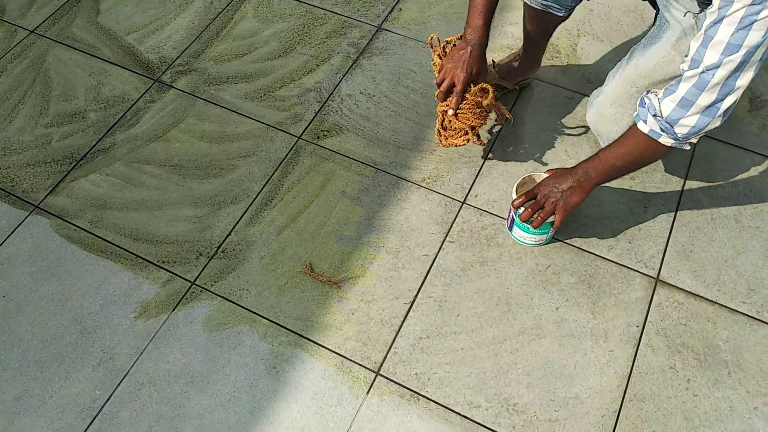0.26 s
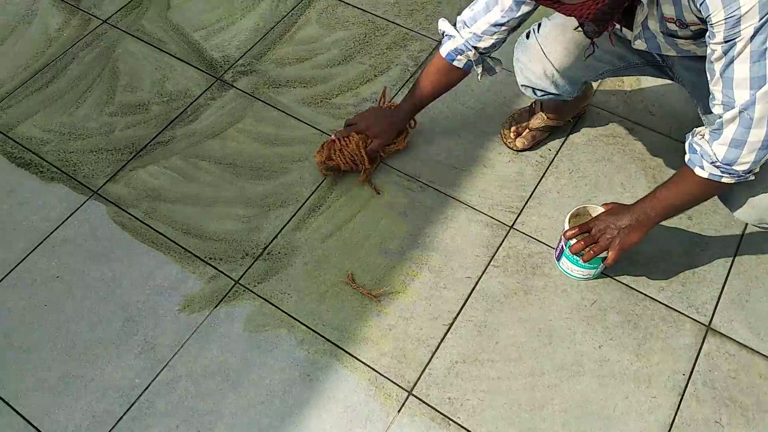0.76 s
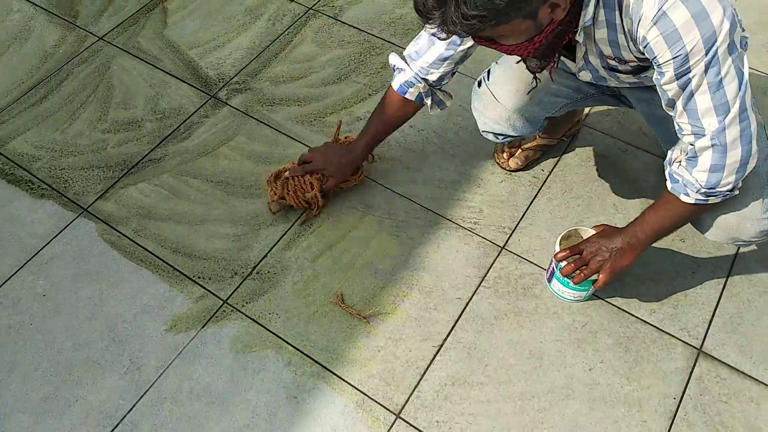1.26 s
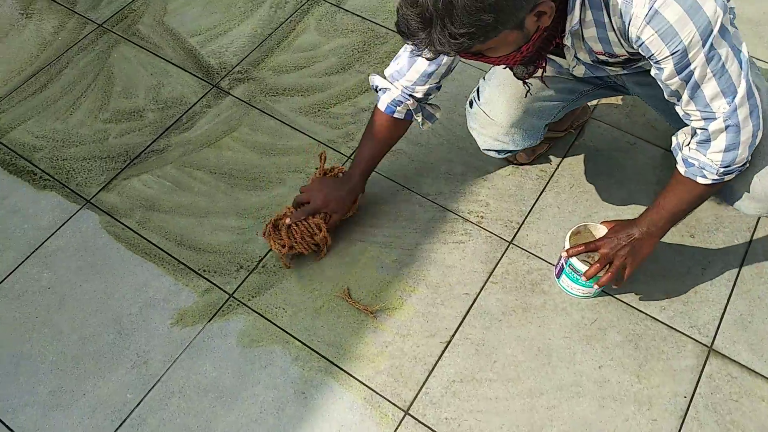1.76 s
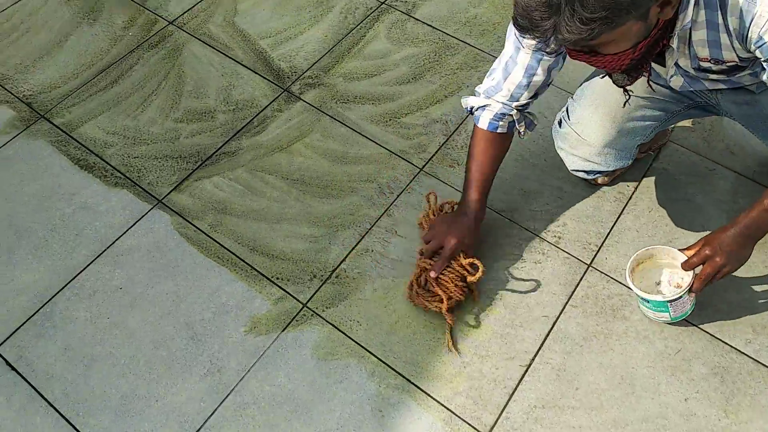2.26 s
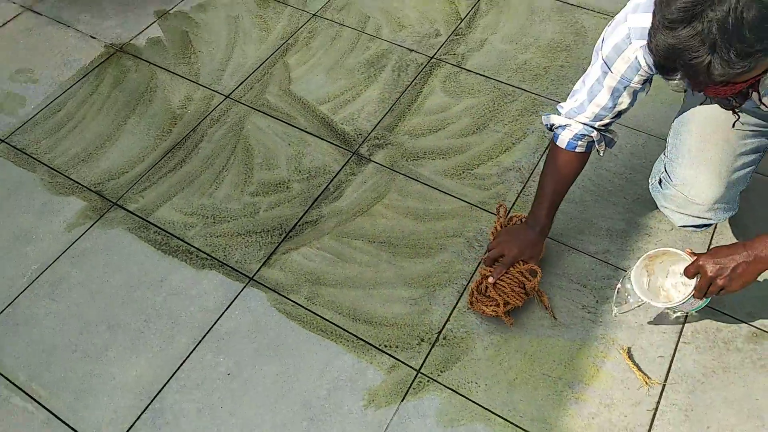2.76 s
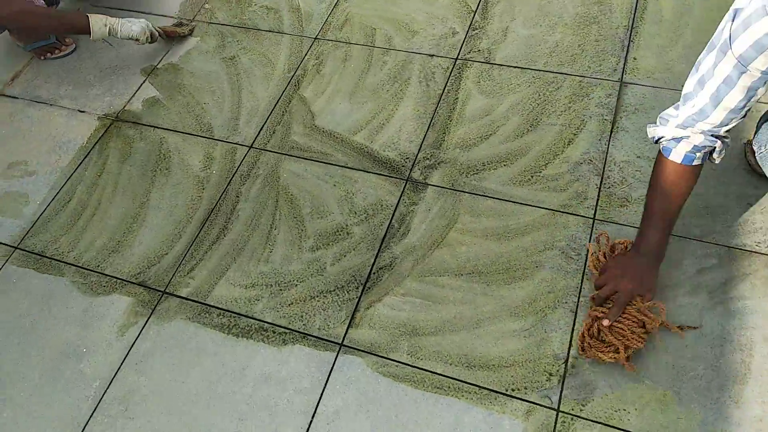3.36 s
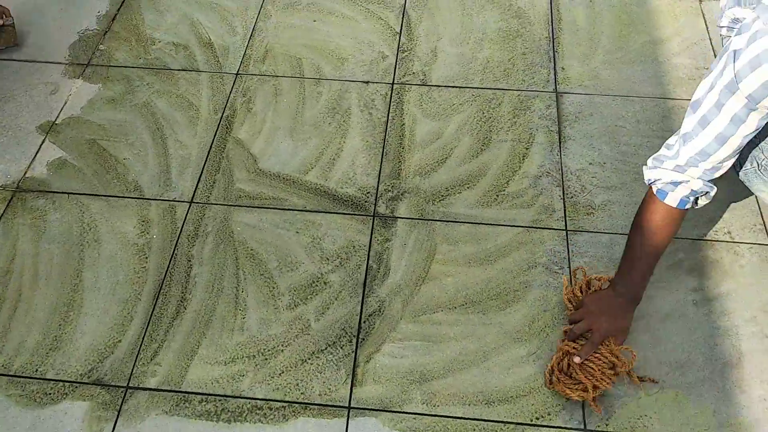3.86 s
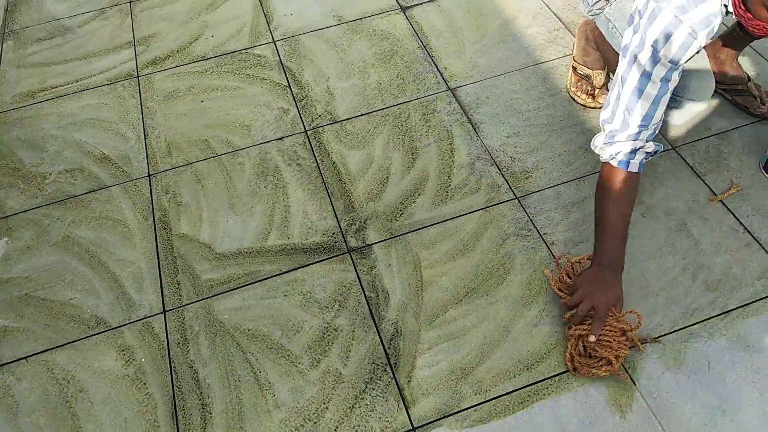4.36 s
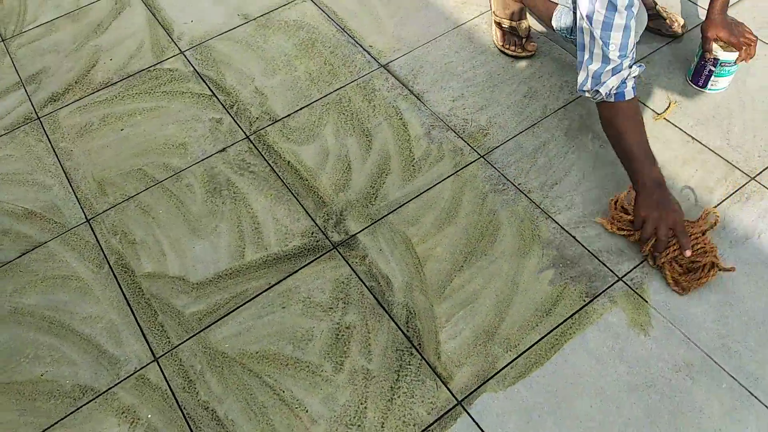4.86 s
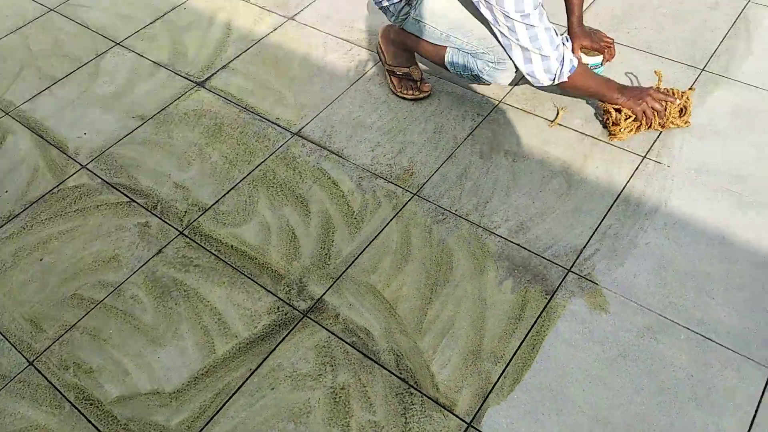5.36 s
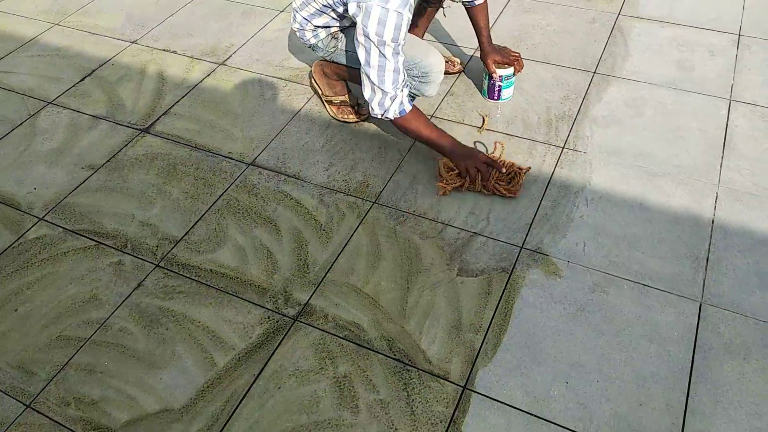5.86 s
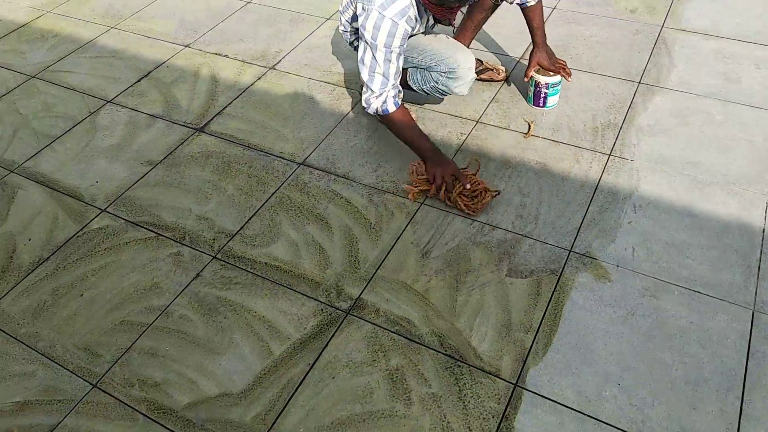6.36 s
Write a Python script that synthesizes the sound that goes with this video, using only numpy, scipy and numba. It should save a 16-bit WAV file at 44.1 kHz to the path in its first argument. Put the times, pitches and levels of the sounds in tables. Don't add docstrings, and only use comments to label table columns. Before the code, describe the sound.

A coarse fibre bundle rasps back and forth over wet floor tiles outdoors while wind gusts thump and rumble against a hand-held microphone.

```python
import sys
import numpy as np
from scipy import signal
from scipy.fft import rfft, irfft
from scipy.io import wavfile
from scipy.ndimage import uniform_filter1d, minimum_filter1d
from numba import njit

SR = 44100
rng = np.random.default_rng(int(sys.argv[2]) if len(sys.argv) > 2 else 0)


def wav_out(sig):
    wavfile.write(sys.argv[1], SR, np.round(np.clip(np.atleast_2d(sig).T, -1, 1) * 32767).astype(np.int16))


def invert_db(x):
    u = np.asarray(x, float) / 20
    return 10 ** u


N = 290697


def unit(x):
    return x / np.sqrt(np.mean(x ** 2))


def curve(table):
    s, *columns = np.transpose(table)
    return [np.interp(np.arange(N) / SR, s, c) for c in columns]


@njit
def svf(x, hz, damp):
    low, band, b, l = np.empty(len(x)), np.empty(len(x)), 0., 0.
    for i in range(len(x)):
        g = np.tan(np.pi * hz[i] / SR)
        v = (b + g * (x[i] - l)) / (1 + g * (g + damp))
        low[i], band[i] = l + g * v, damp * v
        b, l = 2 * v - b, l + 2 * g * v
    return low, band


def walk(rate):
    k = int(SR / rate)
    held = np.repeat(rng.standard_normal(N // k + 1), k)
    return 1.3 * uniform_filter1d(uniform_filter1d(held, k), k)[:N]


def add(track, sound, s):
    i = max(int(s * SR), 0)
    track[i:i + len(sound)] += sound[:N - i]


def slips():
    clicks = rng.standard_normal(N) * invert_db(1.59 * rng.exponential(size=N))
    return unit(clicks * invert_db(1.5 * walk(400) + 2.0 * walk(40)))


LIFTED_DB = -62.5
STROKE_FLATNESS = .9
SCRAPE_HZ, SCRAPE_SAG_DB_PER_DB = 2214, 0.09
# start_s, length_s, rasp_db, brightness_db, scrape_db
STROKES = [(-.2, 0.29, -52.5, 12, -60), (0.004, 0.47, -58, 10.5, -67.5), (0.51, 0.37, -40, -1.5, -54),
           (0.889, 0.21, -41, 1.5, -51.5), (1.091, 0.25, -41.5, 3, -51), (1.338, 0.25, -44.5, 4, -59.5),
           (1.561, 0.24, -42, 4.5, -61), (1.817, .24, -43.5, 2.5, -58.5), (2.04, 0.22, -45, 2.5, -57),
           (2.262, 0.21, -45.5, 1.5, -57.5), (2.458, 0.34, -52, 5.5, -48.5), (3.057, 0.24, -45, 2.5, -56),
           (3.305, 0.24, -41.5, 1, -55.5), (3.552, 0.2, -41.5, 2, -51.5), (3.763, 0.25, -43, 2.5, -62.5),
           (3.994, 0.25, -43.5, 3, -50.5), (4.252, 0.27, -43, 3, -55), (4.532, 0.29, -41.5, 1.5, -53),
           (4.815, .28, -44, 5, -54), (5.08, 0.37, -42, 3.5, -47.5), (5.426, .3, -44.5, 8, -52.5),
           (5.576, 0.55, -43, 2.5, -48), (6.026, 0.33, -43, 3, -50.5), (6.31, 0.29, -43.5, 0, -48)]


def arm():
    t = np.arange(0, N, 64) / SR
    start, length, rasp_db, bright_db, scrape_db = np.transpose(STROKES)[:, :, None]
    speed = np.sin(np.pi * np.clip((t - start) / length, 0, 1)) ** STROKE_FLATNESS
    rasp_power = (invert_db(rasp_db) * speed) ** 2
    scrape_power = (invert_db(scrape_db) * speed) ** 2
    lifted_power = invert_db(2 * LIFTED_DB)
    rasp_sum = rasp_power.sum(axis=0) + lifted_power
    scrape_sum = scrape_power.sum(axis=0) + lifted_power / 10

    def mean(column):
        return (rasp_power * column).sum(axis=0) / rasp_sum

    scrape_hz = SCRAPE_HZ * invert_db(-SCRAPE_SAG_DB_PER_DB * mean(scrape_db - rasp_db + 9.5))
    controls = (10 * np.log10(rasp_sum), mean(bright_db), 10 * np.log10(scrape_sum), scrape_hz)
    return [np.interp(np.arange(N) / SR, t, c) for c in controls]


LAG_SAMPLES = 9
SHADOW_DEPTH = 0.25
SCRAPE_DAMP, SCRAPE_CATCH_DB = 0.4, 3
# time_s, turn (0 facing, 1 turned)
TURN = [(0, 0.57), (.45, 0.93), (.58, 0.16), (1.2, .0), (2.2, 0.33), (2.7, 0.9), (3.4, 0.73), (4.2, 0.93),
        (5.0, 0.62), (5.6, 0.82), (6.59, 0.8)]
# facing_hz, turned_hz, width_hz, facing_db, turned_db
LEFT_PORT = [(3189, 2700, 770, -11, -10), (4364, 3980, 1350, -3.5, -3.5), (6530, 5100, 1270, -11.5, -3),
             (7760, 7560, 1230, -5.5, -7), (9310, 9440, 3020, 0.5, -3.5), (11630, 10740, 3400, -10.5, -3),
             (14150, 14400, 5200, -13, -11)]
RIGHT_PORT = [(3310, 3300, 800, -9.5, -8), (4300, 4300, 1320, -0.5, -3), (5970, 6880, 1850, 1.5, -1.5),
              (8100, 8040, 1200, -9, 0), (9210, 9170, 2600, 0, -7), (12900, 12300, 4200, -17, -8.5),
              (14300, 15100, 5700, -11, -13.5)]
# facing_hz, turned_hz, width_hz
SHADOW = [
    (5400, 6700, 700),
    (5150, 5300, 350),
]
PORT_DB = [18.5, 18.5]


def scrub():
    rasp_db, bright_db, scrape_db, scrape_hz = arm()
    turn = np.clip(curve(TURN)[0], 0, 1)
    shared = slips()
    out = []
    for side, port in enumerate((LEFT_PORT, RIGHT_PORT)):
        own = slips()
        near = np.roll(shared, LAG_SAMPLES * side)
        low = .72 * near + .7 * own
        rasp = 0
        for hz0, hz1, width, db0, db1 in port:
            hz = hz0 + turn * (hz1 - hz0) + 110 * walk(5)
            tufts = np.roll(low if hz0 < 5000 else own, int(2 * hz0))
            ring = svf(tufts, hz, width / hz0)[1]
            ring = svf(ring, hz, 1.8 * width / hz0)[1]
            treble_share = np.clip((hz - 5500) / 2000, 0, 1)
            db = db0 + turn * (db1 - db0) + (bright_db - 2.0) * treble_share
            rasp = rasp + invert_db(db + 1.3 * walk(11)) * ring
        hz0, hz1, width = SHADOW[side]
        shadow_hz = hz0 + turn * (hz1 - hz0) + 120 * walk(5)
        rasp = rasp - SHADOW_DEPTH * svf(rasp, shadow_hz, width / hz0)[1]
        scrape = svf(svf(low, scrape_hz, SCRAPE_DAMP)[1], scrape_hz, 1.1)[1]
        scrape_gain = invert_db(scrape_db + 2.5 + SCRAPE_CATCH_DB * walk(12))
        out.append(invert_db(rasp_db + PORT_DB[side]) * rasp + scrape_gain * unit(scrape))
    return np.array(out)


GUST_RISE_DB_PER_S, GUST_FALL_DB_PER_S = 899.5, 500


def gusts(table):
    t = np.arange(N) / SR
    levels = []
    for s, length, db in table:
        rise_db = GUST_RISE_DB_PER_S * (s - t).clip(0)
        fall_db = GUST_FALL_DB_PER_S * (t - s - length).clip(0)
        levels.append(db - rise_db - fall_db)
    return uniform_filter1d(np.max(levels, axis=0).clip(-110, 0), size=900)


STRAY_DB, STRAY_SCATTER_DB = 5, 2.5
STRAY_CRACKLE_DB, STRAY_SHARPEN = -13, 1


def strays(db, count=60):
    s = rng.random(count) * (N - 1) / SR
    air_db = db[(s * SR).astype(int)]
    thump_db = air_db + STRAY_DB + STRAY_SCATTER_DB * rng.standard_normal(count)
    return list(zip(s, thump_db, thump_db + STRAY_CRACKLE_DB + STRAY_SHARPEN * (air_db + 18.5)))


STILL_DB = -64
HUM_DB = -69.5
CRACKLE_RISE_S, CRACKLE_FALL_S = 0.0044, 0.01
# start_s, length_s, level_db
LEFT_GUSTS = [(-.1, 0.84, -54.5), (0.846, 0.29, -38.5), (1.28, 0.089, -43), (1.444, 0.44, -36.5),
              (1.87, 0.12, -46), (2.071, .22, -16), (2.307, .05, -19.5), (2.38, .12, -13.5),
              (2.536, 0.13, -27), (2.75, .1, -27.5), (2.871, 0.072, -29), (2.969, .24, -19),
              (3.234, 0.19, -26), (3.4, .2, -36), (3.636, 0.193, -28), (3.846, 0.093, -32.5),
              (4.212, .2, -42), (4.379, 0.15, -32.5), (4.622, 0.059, -39), (4.943, 0.018, -43.5),
              (5.277, 0.21, -48.5), (5.48, .27, -57.5), (5.79, 0.2, -36.5), (6.023, 0.25, -41),
              (6.313, .4, -47.5)]
RIGHT_GUSTS = [(-.1, 0.22, -30.5), (.14, 0.16, -49.5), (.32, 0.049, -38.5), (.39, .13, -52.5),
               (.47, .07, -43.5), (0.548, .17, -22.5), (.72, 0.1, -19.5), (.86, .12, -32.5),
               (.97, 0.28, -31.5), (1.26, 0.15, -45.5), (1.46, 0.21, -36.5), (1.72, 0.24, -41.5),
               (1.95, 0.32, -24), (2.35, 0.17, -32.5), (2.55, 0.36, -28.5), (2.95, .25, -28),
               (3.2, 0.27, -40), (3.45, .21, -50), (3.7, 0.12, -28), (3.94, 0.03, -54.5), (4.44, 0.15, -45),
               (4.96, 1.14, -55), (6.1, .6, -50.5)]
# time_s, thump_db, crackle_db
LEFT_PUFFS = [(1.015, -17, -53.5), (1.552, -18.5, -49.5), (1.742, -15, -51.5), (1.916, -20.5, -46.5),
              (2.098, -17, -28.5), (2.166, -6, -21), (2.234, -18, -18.5), (2.269, -7.5, -21),
              (2.324, -16, -32), (2.408, -8, -15.5), (2.439, -21, -14.5), (2.482, -3.5, -15.5),
              (2.607, -17, -34), (2.769, -9.5, -31), (2.827, -11.5, -47), (2.905, -13, -43),
              (2.996, -11, -38), (3.024, -10, -33), (3.068, -22, -36), (3.11, -12.5, -23),
              (3.172, -25, -15), (3.306, -13.5, -28.5), (3.689, -13, -55), (3.787, -16, -38.5),
              (4.416, -17.5, -53), (4.636, -22, -44.5), (5.399, -28, -69), (6.003, -25.5, -55),
              (6.231, -13, -38.5), (6.578, -15.5, -48)]
RIGHT_PUFFS = [(0.055, -16.5, -36), (0.366, -27.5, -65), (0.561, -6.5, -37), (0.62, -11, -30.5),
               (0.698, -22, -43), (0.744, -14, -38), (0.788, -21, -28.5), (0.827, -11, -32.5),
               (0.882, -19, -51), (1.028, -21.5, -32.5), (1.106, -17, -47.5), (1.173, -18.5, -55),
               (1.239, -21, -51), (1.643, -23, -62), (1.885, -20, -63.5), (1.99, -10.5, -26),
               (2.035, -13, -36), (2.131, -21, -44), (2.22, -13, -38), (2.341, -16, -39), (2.414, -17, -38),
               (2.548, -16, -42.5), (2.622, -19, -46), (2.725, -23, -52), (2.879, -19, -44),
               (3.061, -8, -35.5), (3.151, -10.5, -46), (3.29, -23, -48), (3.517, -23.5, -58.5),
               (3.736, -19, -38)]
REACH_HZ = [164.3, 135]


def wind():
    out, t = np.zeros((2, N)), np.arange(-900, 900) / SR
    crackle_filter = signal.butter(3, [200, 520], "band", fs=SR)
    crackle_shape = np.exp(-(t / np.where(t < 0, CRACKLE_RISE_S, CRACKLE_FALL_S)) ** 2)
    hum_hz, body_hz = np.full(N, 330.), np.full(N, 110.)
    air_levels = (gusts(LEFT_GUSTS), gusts(RIGHT_GUSTS))
    for track, base_hz, db, puffs in zip(out, REACH_HZ, air_levels, (LEFT_PUFFS, RIGHT_PUFFS)):
        lumps_db = 2.1 * walk(25) + 2.46 * walk(80)
        reach_hz = base_hz * invert_db(0.28 * (db + 38.0 + 3.07 * lumps_db).clip(-25, 30))
        eddies = svf(rng.standard_normal(N), reach_hz, 2.83)[0]
        eddies = svf(eddies, 1.215 * reach_hz, 0.68)[0]
        eddies = unit(svf(eddies * np.sqrt(150 / reach_hz), body_hz, 1.0)[1])
        open_share = 1 / (1 + np.exp(-(db - STILL_DB) / 1.5))
        hum = svf(rng.standard_normal(N), hum_hz, 0.46)[0]
        hum = unit(svf(hum, hum_hz, 0.46)[0])
        track += open_share * (invert_db(db + 2 + lumps_db) * eddies + invert_db(HUM_DB) * hum)
        for s, thump_db, crackle_db in list(puffs) + strays(db):
            hz = 165 * invert_db(0.33 * (crackle_db - thump_db + 18.5))
            thump = np.exp(-(t * hz / 0.33) ** 2) * np.sin(2 * np.pi * (hz * t + rng.random()))
            grain = unit(signal.lfilter(*crackle_filter, rng.standard_normal(len(t))))
            puff = invert_db(thump_db + 6.0) * thump + invert_db(crackle_db + 1.5) * crackle_shape * grain
            add(track, puff, s - 900 / SR)
    return signal.sosfilt(signal.butter(3, 65, "high", fs=SR, output="sos"), out)


AIR_DB, AIR_SWELL_DB = -60.5, 1.2
# pitch_hz, density_db
AIR = [(380, -21), (430, -0.5), (700, -1), (1200, 1), (2000, 4), (4000, -16.5), (6000, -1.5), (9000, -44),
       (15500, -17.5)]


def air():
    hz = np.maximum(np.arange(N // 2 + 1) * SR / N, 1)
    colour_hz, colour_db = np.transpose(AIR)
    colour = invert_db(np.interp(np.log(hz), np.log(colour_hz), colour_db, left=-90))
    alike = np.clip(400 / hz, 0, .7)
    mid, left, right = rfft(rng.standard_normal((3, N)))
    apart = np.sqrt(1 - alike ** 2) * np.array([left, right])
    hiss = irfft(colour * (alike * mid + apart), N)
    return invert_db(AIR_DB + AIR_SWELL_DB * walk(3.11)) * unit(hiss)


# time_s, peak_db, pitch_hz, t60_s
KNOCKS = [(.302, -41, 397, 0.021), (0.382, -44, 950, 0.044), (.462, -41.5, 658, 0.14),
          (0.468, -46.5, 1800, 0.22), (.487, -38.5, 630, 0.03), (1.327, -43, 1430, 0.049),
          (1.33, -44, 593, 0.038), (1.332, -48, 1060, 0.068), (1.333, -43.5, 2290, 0.055),
          (1.845, -55.5, 783, 0.16), (3.005, -52, 6140, 0.0068), (4.255, -46, 640, 0.21),
          (4.795, -52.5, 620, 0.12), (4.802, -53.5, 345, 0.13), (4.82, -54.5, 493, 0.21)]


def knocks():
    out, t = np.zeros(N), np.arange(6000) / SR
    for s, db, hz, t60 in KNOCKS:
        roughness = 1 + 6.1 * uniform_filter1d(rng.standard_normal(len(t)), size=90)
        ring = np.sin(2 * np.pi * hz * t) * roughness
        add(out, invert_db(db - 60 * t / t60) * np.minimum(t / 0.001, 1) * ring, s)
    return signal.sosfilt(signal.butter(4, 260, "high", fs=SR, output="sos"), out)


SWISH_S, SWISH_HALF_S = .46, .11
# left_db, right_db, pitch_hz
SWISH = (-38.5, -32.5, 7260)


def swish():
    left_db, right_db, hz = SWISH
    speed = np.exp(-((np.arange(N) / SR - SWISH_S) / SWISH_HALF_S) ** 4)
    out = []
    for db in (left_db, right_db):
        hiss = svf(slips(), np.full(N, 1. * hz), 0.28)[1]
        out.append(invert_db(db) * speed * unit(hiss))
    return np.array(out)


def scene():
    return scrub() + wind() + air() + knocks() + swish()


def dropouts(x):
    hz, _, z = signal.stft(x, SR, nperseg=2048, noverlap=1536)
    power = np.abs(z[:, :1024]) ** 2 * (hz[:1024] > 900)[:, None]
    band_hz = hz[:1024:8]
    bands = power.reshape(2, 128, 8, -1).mean(axis=(0, 2))[None]
    bands = uniform_filter1d(bands, size=3, axis=2)
    mask = uniform_filter1d(bands, size=15, axis=1)
    need_db = 7 * uniform_filter1d(rng.standard_normal(bands.shape), size=5, axis=2)
    margin_db = np.interp(band_hz, [1000, 2400, 5500, 7500, 10500, 12500, 15500],
                          [-10, -6.5, -4.5, -8.5, -6, -3.5, -4.5])
    weak = bands < mask * invert_db(2 * (margin_db[:, None] + need_db))
    drop = weak & (band_hz > 1100)[:, None]
    keep = minimum_filter1d(1. * ~drop, size=4, axis=2)
    z[:, :1024] *= keep.repeat(8, axis=1)
    return signal.istft(z, nperseg=2048, noverlap=1536)[1][:, :N]


def low_pass(x):
    return signal.sosfilt(signal.butter(12, 16470, fs=SR, output="sos"), x)


TOP_HZ = 15850


def record(dry):
    rounded = np.tanh(1.49 * dry) / 1.599
    top = signal.ellip(10, .2, 80, TOP_HZ, fs=SR, output="sos")
    mix = signal.sosfilt(top, dropouts(rounded))
    return low_pass(mix)


dry = scene()
out = record(dry)
wav_out(out)
```